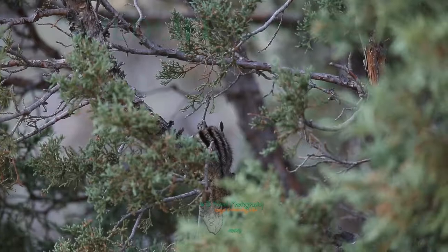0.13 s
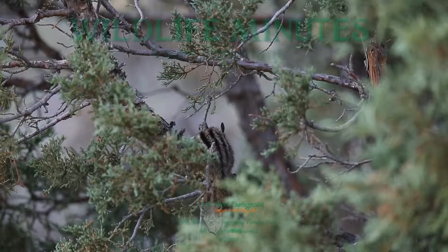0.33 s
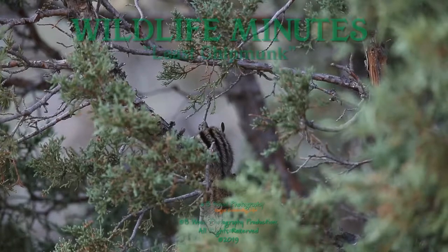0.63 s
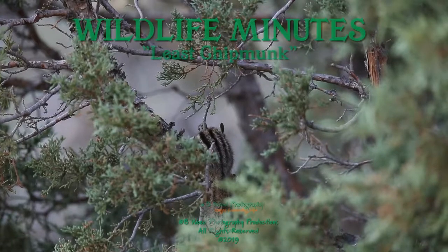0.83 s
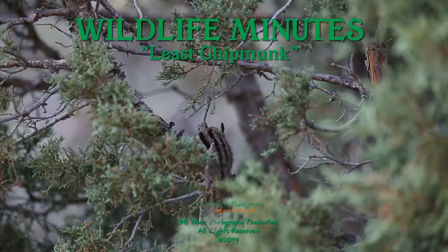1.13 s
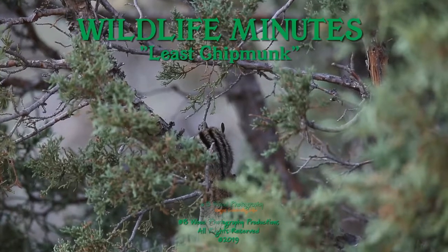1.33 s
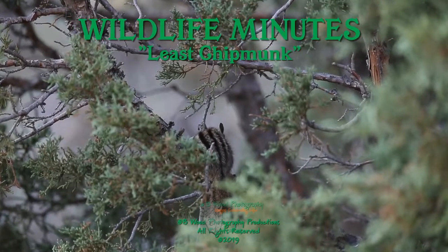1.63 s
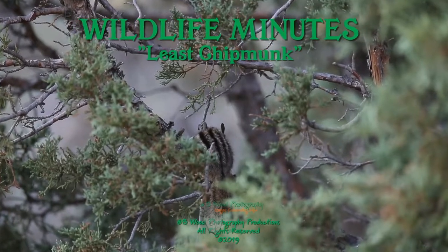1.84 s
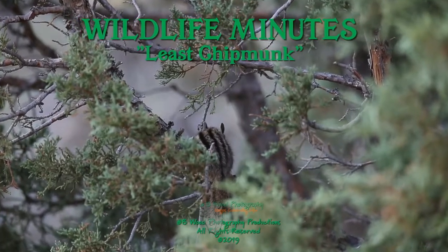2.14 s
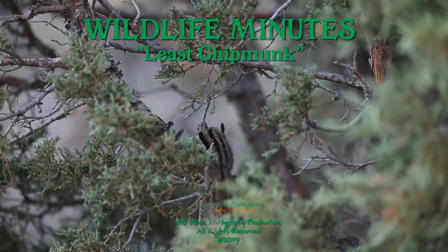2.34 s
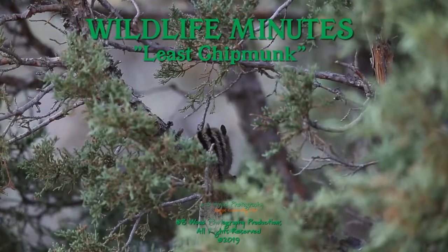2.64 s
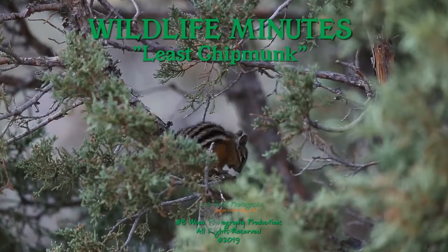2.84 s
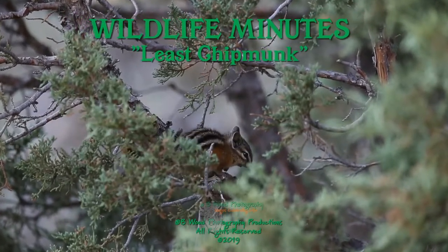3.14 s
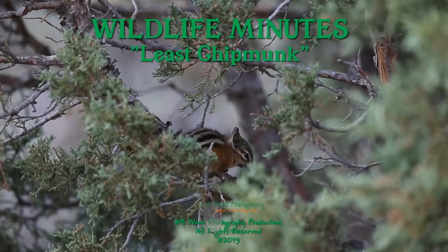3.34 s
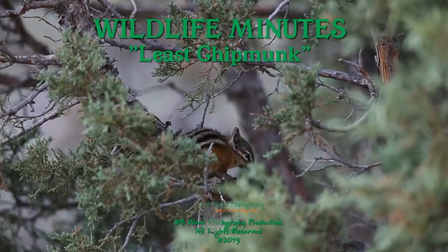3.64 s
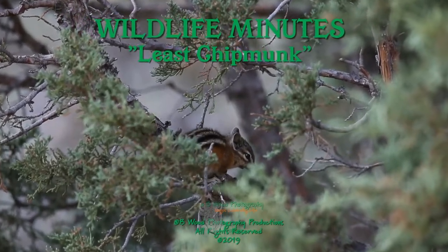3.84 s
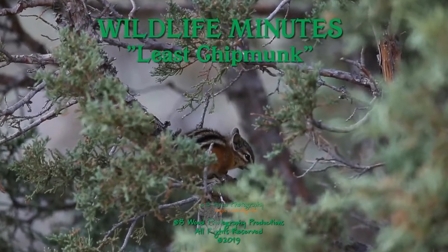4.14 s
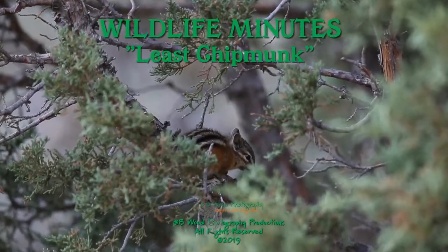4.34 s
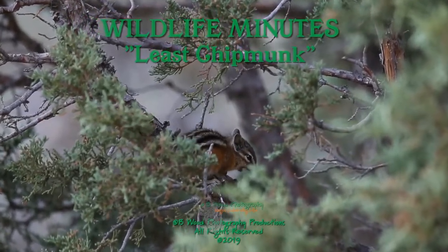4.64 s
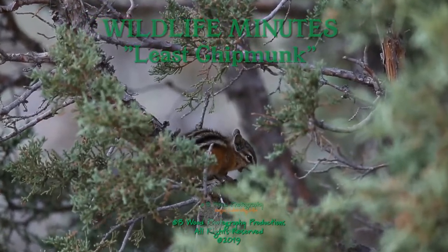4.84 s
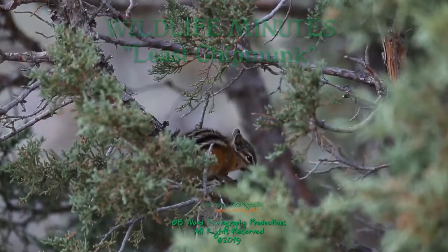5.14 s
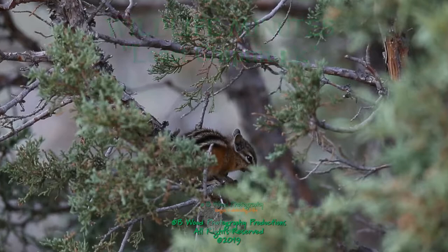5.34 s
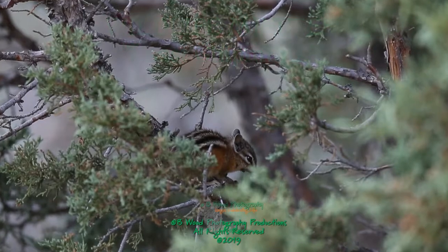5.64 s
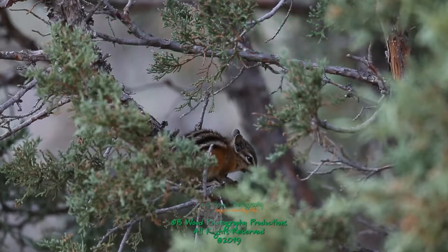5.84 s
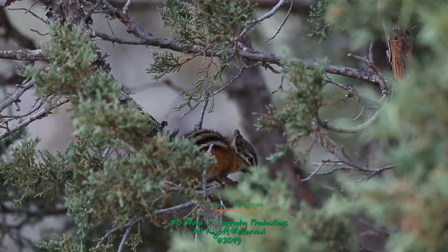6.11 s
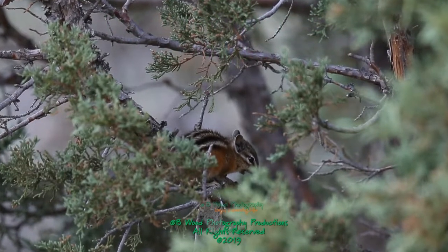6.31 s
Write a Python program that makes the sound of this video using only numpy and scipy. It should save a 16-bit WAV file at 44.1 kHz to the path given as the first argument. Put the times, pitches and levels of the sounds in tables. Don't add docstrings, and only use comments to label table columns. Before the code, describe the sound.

Two chipmunks in conifers call throughout, each giving tiny, sharp, upward-whipping whistles roughly five times a second. Their rhythms slide past each other, sometimes nearly together, sometimes alternating. Trunks and boughs return a short dry scatter. A faint bird twitters at the start and again near the middle. Behind are low distant rush, smooth hiss and faint hum. One microphone, centred, animals clear and fairly close.

```python
import sys
import numpy as np
from scipy import signal
from scipy.fft import rfft, irfft, next_fast_len
from scipy.io import wavfile
from scipy.ndimage import uniform_filter1d, map_coordinates

SR = 44100
rng = np.random.default_rng(int(sys.argv[2]) if len(sys.argv) > 2 else 0)


def field_ratio(decibels):
    return 10 ** (np.asarray(decibels, dtype=float) / 20)


def to_wav(sig):
    pcm = np.clip(np.atleast_2d(sig), -1, 1) * 32767
    pcm = np.round(pcm).astype(np.int16)
    wavfile.write(sys.argv[1], SR, pcm.T)


N = 285327

# pitch in Hz, time to die by 60 dB in seconds.
BOUGHS = [(1500, 0.033), (4500, 0.063), (5500, 0.093), (6500, 0.051), (10000, 0.044)]


def unit(x):
    return x / np.sqrt(np.mean(x ** 2) + 1e-20)


def along(points, hz):
    f, v = np.transpose(points)
    return np.interp(np.log(hz + 1), np.log(f + 1), v)


def coloured(x, spectrum):
    m = next_fast_len(len(x) + 512)
    gain = field_ratio(along(spectrum, np.fft.rfftfreq(m, 1 / SR)))
    return irfft(rfft(x, m) * gain, m)[:len(x)]


def wobble(rate):
    knots = rng.standard_normal(int(N * rate / SR) + 4)
    return map_coordinates(knots, [np.arange(N) * rate / SR])


def rush(spectrum, patchy_db):
    z = signal.stft(rng.standard_normal(N + 512), nperseg=512)[2]
    patches = uniform_filter1d(rng.standard_normal(z.shape), size=6, axis=0)
    patches = unit(uniform_filter1d(patches, size=12, axis=1))
    noise = signal.istft(z * field_ratio(patchy_db * patches), nperseg=512)[1][:N]
    m = next_fast_len(N + 8192)
    gain = field_ratio(along(spectrum, np.fft.rfftfreq(m, 1 / SR)))
    return unit(irfft(rfft(noise, m) * gain, m)[:N])


def far_rush():
    # time in seconds, strength in dB.
    swell_points = [(0.3, -53.5), (0.67, -51), (1.15, -56), (2.22, -55), (2.41, -45.5), (2.58, -52),
                    (3.09, -53), (3.59, -53.5), (5.02, -53), (5.38, -52), (6.13, -55), (6.4, -54.5)]
    # pitch in Hz, strength in dB per Hz.
    rumble_colour = [(15, -44), (25, -44), (49, -3.5), (86, 0.5), (113, 2.5), (220, 1.5), (290, 0.5),
                     (480, -120)]
    body_colour = [(100, -69), (170, -2.5), (318, -2.5), (350, 0.5), (700, -6.5), (910, -9), (1540, -120)]
    air_colour = [(290, -18.5), (500, -4.5), (661, -3.5), (1080, 0.5), (1170, -1), (1900, -17), (2470, -54),
                  (4180, -120)]
    swell_db = np.interp(np.arange(N) / SR, *np.transpose(swell_points))
    swell_db = swell_db - swell_db.mean()
    drift_db = 1.44
    rumble_db = -58.5 - 0.21 * swell_db + drift_db * wobble(2.31) + 0.28 * wobble(12)
    breath_db = .5 * wobble(5.5)
    body_db = -52 - 0.16 * swell_db + drift_db * wobble(2.7) + breath_db
    air_db = -52 + 0.66 * swell_db + breath_db
    low = field_ratio(rumble_db) * rush(rumble_colour, patchy_db=-0.6)
    middle = field_ratio(body_db) * rush(body_colour, patchy_db=0.64)
    high = field_ratio(air_db) * rush(air_colour, patchy_db=1.47)
    return low + middle + high


def smooth_hiss():
    # pitch in Hz, strength in dB per Hz.
    hiss_colour = [(880, -15.5), (1500, -3), (1970, -9), (3300, -12.5), (5120, -16.5), (11000, -18.5),
                   (13400, -20), (15900, -21.5)]
    return field_ratio(-53) * rush(hiss_colour, patchy_db=1.54)


def mains_hum():
    # pitch in Hz, level in dB rms.
    hum_lines = [(59.2, -60.5), (118.4, -64.5), (226.1, -63.5), (296.1, -65.5), (355.3, -60.5),
                 (473.7, -64)]
    t = np.arange(N) / SR
    out = np.zeros(N)
    for hz, db in hum_lines:
        level_db = db + 1.5 + 1.5 * wobble(2.93)
        unsteady_phase = hz / 160 * wobble(5)
        out += field_ratio(level_db) * np.sin(2 * np.pi * hz * t + unsteady_phase)
    return out


def throbs():
    # start in seconds, length in seconds, pitch in Hz, level in dB.
    throb_list = [
        (.62, 0.25, 203.3, -53.5),
        (1.12, .14, 117, -67),
        (3.524, 0.12, 77, -55),
        (3.551, 0.15, 114.8, -54),
        (3.817, 0.22, 119.9, -51),
    ]
    out = np.zeros(N)
    for s, length, hz, db in throb_list:
        u = np.arange(round(length * SR)) / (length * SR)
        throb = np.sin(np.pi * u) * np.sin(2 * np.pi * hz * length * u)
        out[round(s * SR):][:len(u)] += field_ratio(db) * throb
    return out


def parting(x, side_db):
    hz, t, z = signal.stft(rng.standard_normal(N + 2048), SR, nperseg=2048)
    share = np.interp(t, [3.9, 4.6], [.56, 0])
    share = share * np.clip((hz[:, None] - 9000) / 5000, 0, 1)
    blocks = rng.random((len(hz) // 64 + 1, len(t)))
    blocks = np.repeat(blocks, 64, axis=0)[:len(hz)]
    side = field_ratio(side_db) * signal.istft(z * (blocks < share), SR, nperseg=2048)[1][:N]
    return x + side * [[1], [-1]]


def scatter(t60s, lumpy_db):
    hz, t, z = signal.stft(rng.standard_normal(SR // 3), SR, nperseg=128)
    lumps = field_ratio(lumpy_db * rng.standard_normal(len(t)))
    decay = field_ratio(-60 * t / along(t60s, hz)[:, None])
    tail = signal.istft(z * lumps * decay, SR, nperseg=128)[1]
    return tail / np.linalg.norm(tail)


def bird():
    # start in seconds, length in seconds, start pitch in Hz, end pitch in Hz, level in dB.
    bird_notes = [(.128, .05, 5000, 4000, -57.5), (.235, .032, 4250, 2950, -55),
                  (.268, .01, 3150, 3050, -56), (.288, .019, 3650, 2950, -52.5),
                  (.374, .028, 4000, 2900, -55), (.405, .034, 4050, 2600, -53),
                  (2.472, .018, 3400, 3600, -58), (2.492, .022, 3650, 3800, -56),
                  (2.817, .014, 4750, 4650, -50), (2.834, .015, 4350, 4280, -50),
                  (2.898, .012, 3900, 3650, -55), (2.985, .014, 4700, 4600, -56),
                  (3.0, .015, 4280, 4180, -50), (3.168, .015, 4200, 4050, -49.5),
                  (3.186, .012, 4200, 4120, -53)]
    out = np.zeros(N)
    for s, length, hz0, hz1, db in bird_notes:
        u = np.arange(round(length * SR)) / (length * SR)
        glide = hz0 + (hz1 - hz0) * u
        note = np.sin(2 * np.pi * np.cumsum(glide) / SR) * np.sin(np.pi * u) ** .6
        out[round(s * SR):][:len(u)] += field_ratio(db) * note
    return out + field_ratio(-9) * signal.fftconvolve(out, scatter(BOUGHS, lumpy_db=3))[:N]


def chip(shape, throat, partials_db, length, pitch, flutter_db, waver):
    s, hz, effort_db = np.transpose(shape)
    s = s * length
    t = np.arange(s[0], s[-1], 1 / SR)
    knots = rng.standard_normal((2, len(t)))[:, ::36]
    flutter, unsteady = [np.interp(t, t[::36], k) for k in knots]
    glide = np.interp(t, s, hz)
    turn = 2 * np.pi * np.cumsum(pitch * glide * (1 + waver * unsteady)) / SR
    beating_db = 1.5 * np.cos(2 * np.pi * 390 * (t / length - .002))
    level_db = np.interp(t, s, effort_db) + flutter_db * flutter + beating_db
    tone = np.zeros(len(t))
    for k, db in enumerate(partials_db, start=1):
        shine_db = 2.2 * rng.standard_normal() * (k * glide > 7200)
        tone += field_ratio(level_db + db + along(throat, k * glide) + shine_db) * np.sin(k * turn)
    return t[0], tone


def chipmunk(calls, voice, trunks, echo, boughs_db, wood_db, reach, stir):
    # pitch in Hz, time to die by 60 dB in seconds.
    far_wood = [(1500, .3), (4600, .3), (5500, .5), (6500, .36), (10000, .22)]
    # pitch in Hz, gain in dB.
    mouth = [(3300, 0), (3900, -8), (4350, -10), (4700, 0), (6700, 0), (7300, -8), (7900, 0)]
    close = [(hz, reach * t60) for hz, t60 in BOUGHS]

    def wood():
        near_tail = field_ratio(boughs_db) * scatter(close, lumpy_db=3)
        return near_tail + field_ratio(wood_db) * scatter(far_wood, lumpy_db=2)

    out = np.zeros(N + SR)
    perch = wood()
    rise = np.clip(np.arange(len(perch)) / SR / .004, 0, 1) ** 2
    for s, db, length, pitch in calls:
        lead, tone = chip(*voice, length, pitch, flutter_db=1.5, waver=.008)
        answer = rise * (np.sqrt(1 - stir) * perch + np.sqrt(stir) * wood())
        for delay, echo_db in trunks:
            answer[round(delay * SR)] += field_ratio(echo_db + rng.normal(0, 1.5))
        answer = coloured(answer, echo)
        answer[0] += 1
        sound = field_ratio(db) * signal.fftconvolve(tone, answer)
        out[round((s + lead) * SR):][:len(sound)] += sound
    return coloured(out[:N], mouth)


def far_chipmunk():
    # seconds from its loudest part, pitch in Hz, effort in dB.
    far_chip = [
        (-.013, 1800, -49),
        (-.011, 1950, -34),
        (-.005, 2750, -24),
        (-.0036, 2860, -44),
        (-.003, 4520, -27),
        (.0003, 4880, -24),
        (.002, 6200, -24),
        (.0038, 6380, -25),
        (.0055, 6550, -55),
    ]
    # time in seconds, strength in dB, length factor, pitch factor.
    far_calls = [(0.1938, 3, 0.95, 0.97), (0.445, 0.2, 1, 0.99), (0.672, 1.5, 1.05, 0.99),
                 (0.9264, 0.5, 0.94, 1.007), (1.083, 1, 1.02, 0.99), (1.2914, 0, 0.99, 0.99),
                 (1.5071, -0.5, 1, 0.98), (1.7448, -0.2, 1.14, 1.014), (1.8959, 2.3, 1, 1),
                 (2.1366, 0.5, 0.94, 0.98), (2.4764, 0.7, 1.04, 0.99), (2.738, 0.0, 0.99, 0.99),
                 (2.9174, 1.5, 0.92, 1.04), (3.1161, 3, 0.9, 1.03), (3.3102, 4.5, 0.76, 1.035),
                 (3.4868, -1.5, 1.35, 1.0), (3.6906, -1.5, 0.95, 1.02), (3.8978, -1.5, 0.87, 1.03),
                 (4.1209, -3, 1.03, 1.02), (4.3397, -4, 0.86, 1.0), (4.5255, -4.5, 0.88, 1.03),
                 (4.7485, -3.5, 1.2, 1.03), (4.9532, -1, 1.03, 1.035), (5.1702, -1, 0.94, 1.035),
                 (5.368, 0.5, 0.82, 1.03), (5.5539, -1.5, 1.48, 1.036), (5.7664, -2, 0.95, 1.04),
                 (6.0667, -1.5, 0.94, 1.03), (6.3832, -5, 1.16, 1.02)]
    # pitch in Hz, gain in dB.
    far_throat = [(2000, -23), (3900, -15.5), (4500, -2.5), (4950, -1), (6600, -1), (8250, -9),
                  (9300, -16.5), (10800, -45)]
    # delay in seconds, level in dB.
    far_trunks = [(.0042, -15), (.007, -17), (.011, -21), (.016, -23), (.021, -22)]
    # pitch in Hz, gain in dB.
    far_echo = [(2000, 1), (4200, 3.5), (4700, 2), (5500, -3.5), (6300, 2.5), (7200, 5.5), (9000, 13),
                (11000, 8)]
    voice = (far_chip, far_throat, [0, -5.5, -10])
    return chipmunk(far_calls, voice, far_trunks, far_echo, boughs_db=-5, wood_db=-16.5, reach=.7, stir=.35)


def near_chipmunk():
    # seconds from its loudest part, pitch in Hz, effort in dB.
    near_chip = [
        (-.018, 1600, -58),
        (-.008, 2080, -50),
        (-.004, 3000, -31),
        (-.0017, 3600, -45),
        (-.001, 5060, -26),
        (.005, 6000, -23),
        (.0061, 7800, -44),
        (.008, 8950, -34),
        (.013, 9500, -44),
    ]
    # time in seconds, strength in dB, length factor, pitch factor.
    earlier_call = [
        (.035, 0.5, 0.46, 1.01),
    ]
    near_calls = [(0.217, -4.5, 1.17, 1.01), (0.4154, -1, 0.93, 1.0), (0.6112, -0.5, 0.89, 1.0),
                  (0.819, -1.8, 1.04, 1), (1.038, 0, 0.88, 1.005), (1.256, 0.5, 0.85, 1.003),
                  (1.4756, 0.5, 0.86, 1), (1.6783, 0.5, 0.73, 1.007), (1.8759, -0.5, 0.95, 0.99),
                  (2.133, 1, 0.86, 0.98), (2.45, -2, 1.02, 0.99), (2.7113, -0.5, 0.94, 0.99),
                  (2.9486, -1.5, 0.86, 0.98), (3.1301, -0.5, 1.03, 1), (3.3223, 0.5, 0.77, 0.98),
                  (3.5504, -0.5, 0.99, 0.99), (3.7508, -1, 1, 1.0), (3.9416, -1.4, 1.1, 0.98),
                  (4.137, -1.2, 0.95, 1), (4.3246, -1.5, 0.96, 0.99), (4.5202, 0, 1.0, 1.0),
                  (4.7078, -0.5, 0.94, 1), (4.8896, -1.5, 1.0, 0.98), (5.0806, 0.5, 0.86, 0.99),
                  (5.275, -0.5, 1.08, 0.99), (5.437, 0.4, 0.93, 1), (5.6351, 0.3, 0.95, 1),
                  (5.9485, 0.5, 1.02, 0.98), (6.1912, -0.2, 1.01, 0.99), (6.3663, 1.2, 0.9, 0.99)]
    # pitch in Hz, gain in dB.
    near_throat = [(2000, 3.5), (4300, -22), (4950, 1.5), (6700, -1.5), (7400, 1), (8500, -5), (10300, -17),
                   (11800, -38.5)]
    # delay in seconds, level in dB.
    near_trunks = [(.0035, -22), (.0062, -17), (.0088, -16), (.0125, -16), (.019, -19), (.027, -27)]
    # pitch in Hz, gain in dB.
    near_echo = [(2000, 0.5), (4200, 3), (4900, -1), (5500, -1), (6300, -6.5), (7200, 16.5), (8500, 4.5),
                 (11000, 9.5)]
    voice = (near_chip, near_throat, [0.5, -5, -11])
    calls = list(earlier_call) + list(near_calls)
    return chipmunk(calls, voice, near_trunks, near_echo, boughs_db=-5, wood_db=-11.5, reach=1.1, stir=.25)


def scene():
    background = far_rush() + smooth_hiss() + mains_hum() + throbs()
    animals = bird() + far_chipmunk() + near_chipmunk()
    return np.tile(background + animals, (2, 1))


def low_pass(x):
    return signal.sosfilt(signal.butter(12, 16310, fs=SR, output="sos"), x)


def record(dry):
    start_s, top_hz = .0715, 15890
    gate = np.clip((np.arange(N) / SR - start_s) / 0.001, 0, 1)
    spectrum = rfft(parting(dry, side_db=-63) * gate)
    spectrum = spectrum * (np.fft.rfftfreq(N, 1 / SR) < top_hz)
    mix = irfft(spectrum, N) * (gate > 0)
    return low_pass(mix)


dry = scene()
out = record(dry)
to_wav(out)
```